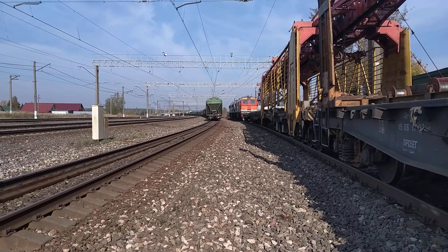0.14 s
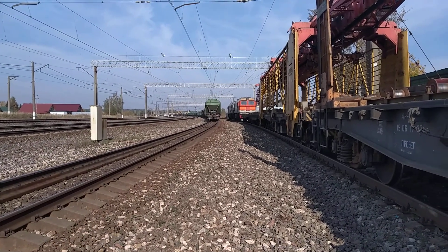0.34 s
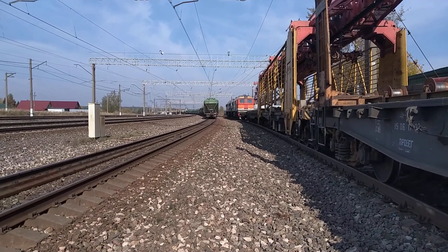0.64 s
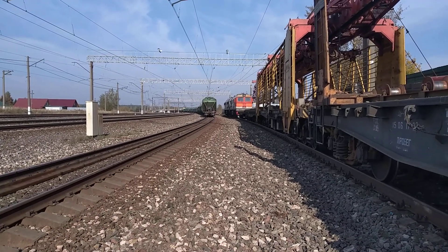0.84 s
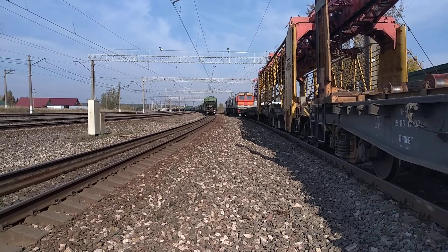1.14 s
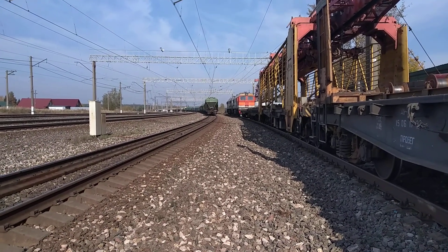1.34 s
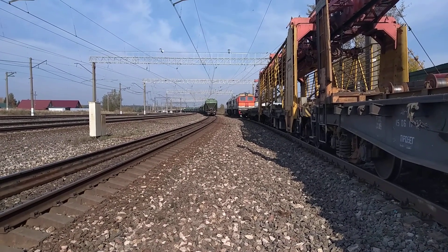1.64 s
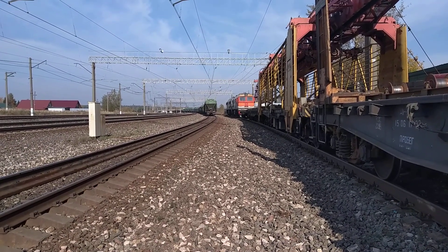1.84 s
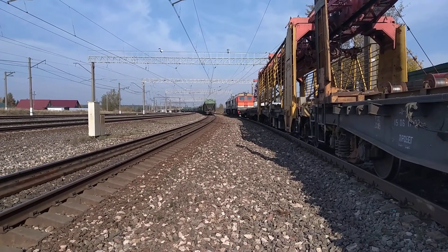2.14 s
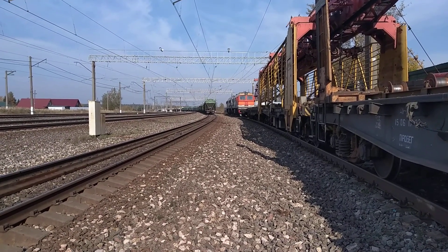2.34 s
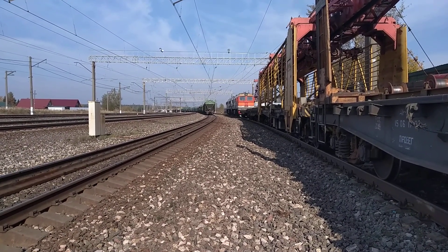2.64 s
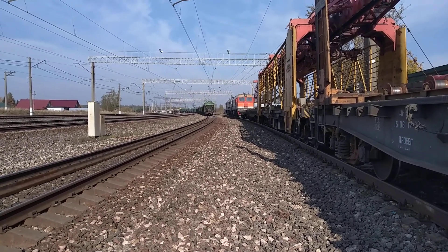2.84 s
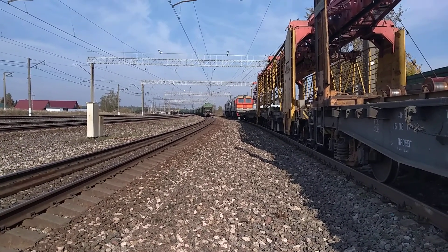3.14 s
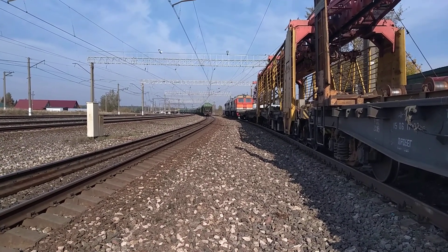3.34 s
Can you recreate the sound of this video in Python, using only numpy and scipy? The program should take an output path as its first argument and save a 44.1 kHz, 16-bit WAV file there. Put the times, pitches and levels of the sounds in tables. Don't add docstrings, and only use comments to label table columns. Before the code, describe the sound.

A freight train's wheels clatter and bang over rail joints as its rumble fades away

```python
import sys
import numpy as np
from scipy import signal
from scipy.fft import rfft, irfft
from scipy.io import wavfile
from scipy.ndimage import uniform_filter1d

SR = 44100
rng = np.random.default_rng(int(sys.argv[2]) if len(sys.argv) > 2 else 0)


def decibels_to_gain(level_db):
    exponent = np.asarray(level_db, float) / 20
    return 10 ** exponent


def dump(signal):
    limited = np.clip(np.atleast_2d(signal).T, -1, 1)
    pcm = np.round(limited * 32767).astype(np.int16)
    wavfile.write(sys.argv[1], SR, pcm)


N = 154350
T = np.arange(N) / SR
HZ = np.arange(N // 2 + 1) * SR / N


def curve(table, hz=HZ):
    table_hz, table_db = np.array(table).T
    return np.interp(np.log(hz + 1), np.log(table_hz), table_db)


def unit(x):
    return x / np.sqrt(np.mean(x ** 2))


def walk(rate_hz):
    hold = int(SR / rate_hz)
    steps = np.repeat(rng.standard_normal(N // hold + 1), hold)
    return unit(uniform_filter1d(uniform_filter1d(steps, hold), hold)[:N])


def band(x, hz, width_hz):
    return signal.lfilter(*signal.iirpeak(hz, hz / width_hz, SR), x)


def swell(start_s, level_db, rise_s, fall_s):
    out = 0
    for s, db, rise in np.broadcast(start_s, level_db, np.abs(rise_s) + 1e-4):
        out = out + decibels_to_gain(db) * np.exp(np.where(T < s, (T - s) / rise, (s - T) / fall_s))
    return out


# pitch_hz, width_hz, boost_db
STEEL_MODES = [(190, 43, 3), (351, 38, 1), (490, 20, 5), (738, 112, 5), (867, 81, 8), (1700, 110, 3),
               (2334, 220, 3), (2933, 64, 10), (3930, 35, 5), (4540, 73, 0), (4300, 59, -12),
               (5334, 130, 6.5)]
# freq_hz, level_db
PORT_SPREAD = [(100, -4.5), (600, -7), (1500, -2), (3000, -2), (8000, -2)]


def steel(colour, grit_db, flicker_db):
    ring_db = sum(max(db, 0) / (1 + (2 * (HZ - hz) / width) ** 2) for hz, width, db in STEEL_MODES)
    contacts = rfft(rng.standard_normal((3, N)) * decibels_to_gain(grit_db * walk(300)))
    shared, separate = contacts[0], contacts[1:]
    rung = (shared + decibels_to_gain(curve(PORT_SPREAD)) * separate) * decibels_to_gain(curve(colour) + ring_db)
    edges_hz = (0, 1200, 3700, SR)
    out = 0
    for lo, hi in zip(edges_hz, edges_hz[1:]):
        out = out + irfft(rung * (HZ >= lo) * (HZ < hi), N) * decibels_to_gain(flicker_db * walk(25.14))
    return unit(out)


# time_s, level_db
ROLL_LEVEL = [(0.0, -35), (0.2, -35), (0.54, -33.5), (0.59, -32.5), (0.65, -30.5), (0.8, -39.5),
              (0.88, -33.5), (1.17, -36), (1.19, -29.5), (1.26, -42.5), (1.32, -30), (1.51, -42.5),
              (1.85, -40.5), (1.89, -48), (1.92, -34.5), (2.31, -46.5), (2.79, -44), (3.5, -49.5)]
# freq_hz, level_db
ROLL_SPECTRUM = [(40, -40), (90, -2), (190, -0.5), (500, -11.5), (1000, -14.5), (3000, -20.5), (8000, -25)]
ROLL_DB = -1.5


def rolling():
    level_db = ROLL_DB + np.interp(T, *np.array(ROLL_LEVEL).T)
    return steel(ROLL_SPECTRUM, 1.2, 1.6) * decibels_to_gain(level_db)


# start_s, level_db, held_s
AIR_PUFFS = [
    (.01, -62, 0.0146),
    (0.094, -50, 0.058),
    (.275, -52, 0.037),
    (.455, -51, 0.057),
    (0.636, -52.5, 0.06),
    (.82, -50.5, 0.071),
    (0.999, -62, 0.13),
]
# freq_hz, level_db
SIZZLE_SPECTRUM = [(7000, -48), (8700, -2.5), (12000, -2), (15500, -6)]
SIZZLE_RISE_S, SIZZLE_FALL_S = 0.016, 0.02


def sizzle():
    gate = 0
    for s, db, held_s in AIR_PUFFS:
        slope = np.minimum((T - s) / SIZZLE_RISE_S, (s + held_s - T) / SIZZLE_FALL_S)
        gate = gate + decibels_to_gain(db) * np.exp(np.minimum(slope, 0))
    hiss = unit(irfft(rfft(rng.standard_normal((2, N))) * decibels_to_gain(curve(SIZZLE_SPECTRUM)), N))
    patchy_db = 1.5 * walk(30)
    port_db = np.array([[8.5], [6.0]])
    return hiss * gate * decibels_to_gain(patchy_db + port_db)


# start_s, level_db
FLAT_BLOWS = [(0.102, -32.5), (0.292, -30.5), (0.482, -34), (0.658, -30.5), (0.859, -30.5), (1.061, -30.5),
              (1.431, -34), (1.62, -36.5), (1.838, -40.5), (2.192, -36), (2.369, -37.5), (2.562, -31.5),
              (2.753, -34), (2.946, -32), (3.133, -34.5), (3.318, -35.5), (3.51, -34.5)]
# freq_hz, level_db
FLAT_SPECTRUM = [(60, -33.5), (190, -3), (800, -7.5), (2000, -9), (5000, -8.5), (9000, -16)]
FLAT_RISE_S, FLAT_FALL_S = 0.019, 0.043


def flat_wheel():
    start_s, level_db = np.array(FLAT_BLOWS).T
    return steel(FLAT_SPECTRUM, 0.74, 1.01) * swell(start_s, level_db, FLAT_RISE_S, FLAT_FALL_S)


# start_s, level_db, pitch_hz, t60_s
BODY_KNOCKS = [(.212, -22, 208, 0.057), (.335, -26.5, 190, 0.1354), (0.485, -20, 229, 0.073),
               (.875, -30.5, 150.6, 0.22), (.938, -22, 250, .2), (.943, -24, 360, .15),
               (1.137, -33, 151.7, 0.12), (1.184, -17.5, 360, 0.073), (1.186, -24, 200, 0.063),
               (1.192, -20.5, 818, 0.073), (1.303, -21, 735.5, 0.11), (1.317, -17.5, 195, 0.13),
               (1.913, -20, 388.4, 0.089), (1.915, -24, 790, 0.064), (2.04, -21.5, 728, 0.093)]
THUD_PUSH_S = 0.0028


def thuds():
    out = 0
    for s, db, hz, t60_s in BODY_KNOCKS:
        t = np.maximum(T - s, 0)
        fade = np.exp(-np.log(1000) * t / t60_s)
        phase = 2 * np.pi * hz * t
        ring = np.sin(phase) + 0.56 * np.sin(1.17 * phase) + 0.35 * fade * np.sin(1.9 * phase)
        push = 1 - np.exp(-t / THUD_PUSH_S)
        out = out + decibels_to_gain(db) * fade * push * ring
    return out


# start_s, thump_db, clatter_db, rise_s
AXLES = [
    (0.227, -52, -34.5, 0.0081),
    (0.353, -36.5, -35, 0.024),
    (1.188, -30, -21, .002),
    (1.317, -34, -25.5, 0.0086),
    (1.915, -28.5, -25.5, .002),
    (2.048, -28.5, -24.5, 0.0038),
]
# freq_hz, level_db
THUMP_SPECTRUM = [(100, -42), (200, -5.5), (400, -8.5), (850, -12), (1100, -28), (2500, -29), (8000, -55)]
# freq_hz, level_db
CLATTER_SPECTRUM = [(100, -16), (300, -2.5), (800, -3), (2000, -5.5), (5000, -7), (8000, -13)]
THUMP_FALL_S, CLATTER_FALL_S, JOINT_BLUR_S = 0.022, 0.065, 0.0058


def joints():
    start_s, thump_db, clatter_db, rise_s = np.array(AXLES).T
    blur = int(JOINT_BLUR_S * SR) + 1
    thump = uniform_filter1d(swell(start_s, thump_db, rise_s, THUMP_FALL_S), blur)
    clatter = uniform_filter1d(swell(start_s, clatter_db, rise_s, CLATTER_FALL_S), blur)
    return steel(THUMP_SPECTRUM, 0.87, 1.1) * thump + steel(CLATTER_SPECTRUM, 1.37, 1.7) * clatter


# start_s, length_s, level_db, pitch_hz
EDDIES = [
    (.385, 0.012, -29, 754),
    (.557, 0.016, -19, 720),
    (0.568, 0.024, -16, 880),
    (0.845, 0.0105, -21, 926),
    (0.86, 0.041, -33.5, 840),
    (1.14, 0.013, -30, 1380),
]


def buffets():
    out, air = 0, rng.standard_normal(N)
    for s, length_s, db, hz in EDDIES:
        gate = np.clip(np.minimum(T - s, s + length_s - T) / 0.0021, 0, 1)
        whistle = unit(band(band(air, hz, 0.6 * hz), hz, 0.6 * hz))
        out = out + decibels_to_gain(db) * gate * whistle
    port_db = np.array([[0.5], [-18]])
    return out * decibels_to_gain(port_db)


ECHO_DB, ECHO_T60_S, SCATTER_HZ = -9, 0.38, 1500


def yard_echo():
    tail = rng.standard_normal((2, N)) * np.exp(-np.log(1000) * T / ECHO_T60_S) * (T > 0.004)
    return decibels_to_gain(ECHO_DB) * rfft(tail) / np.sqrt(np.sum(tail[0] ** 2)) * HZ / (HZ + SCATTER_HZ)


# freq_hz, level_db
LEFT_RESPONSE = [(900, 4.5), (1300, 3), (3000, 1.5), (3750, -10), (4050, 7), (7000, -3.5), (7600, 3.5)]
# freq_hz, level_db
RIGHT_RESPONSE = [(950, 3.5), (1400, 1), (1650, 9), (2900, 0.5), (3600, -8), (4250, 16.5), (5700, 10.5),
                  (6500, 0)]
# freq_hz, lead_rad
LEFT_LEAD = [(0, -0.5), (800, .5), (1800, 6.5), (2400, 7.5), (3200, 2.5), (4150, 8), (4850, 4.5),
             (5600, 0.86)]
SHELF_HZ, SHELF_DB, SHELF_SLOPE_DB_KHZ = 7950, -14, -5.5


def through_ports(train):
    lead_rad = np.interp(HZ, *np.array(LEFT_LEAD).T)
    lead = np.exp(np.array([[0.5j], [-0.5j]]) * lead_rad)
    shelf_db = SHELF_DB / (1 + np.exp(np.clip((SHELF_HZ - HZ) / 110, -50, 50)))
    shelf_db = shelf_db + SHELF_SLOPE_DB_KHZ * np.maximum(HZ - 9500, 0) / 1000
    ports = decibels_to_gain(np.array([curve(LEFT_RESPONSE), curve(RIGHT_RESPONSE)]) + shelf_db)
    return irfft(train * (lead + yard_echo()) * ports, N)


def scene():
    train = rfft(rolling() + flat_wheel() + thuds() + joints())
    return through_ports(train) + sizzle() + buffets()


# freq_hz, share_0_to_1
MUTED_SHARE = [(3000, 0), (3100, .5), (3280, .4), (3450, .06), (6500, .02), (7100, .3), (7700, .05),
               (8300, .75), (9200, .2), (14000, .35), (15500, .6)]
THIN_HZ, THIN_RATIO = 8100, 1.1
MASK_DB, MASK_SHARE = -24, 0.55


def mute_bands(x):
    hz, _, z = signal.stft(x, SR, nperseg=1024)
    luck = rng.random((len(hz) // 4 + 1, z.shape[2] // 4 + 1))
    luck = luck.repeat(4, axis=0).repeat(4, axis=1)[:len(hz), :z.shape[2]]
    share = np.interp(hz[::4], *np.array(MUTED_SHARE).T).repeat(4)[:len(hz), None]
    size = np.abs(z)
    local = uniform_filter1d(size, size=16, axis=1)
    top = (hz > THIN_HZ)[:, None]
    masked = local.mean(0) < decibels_to_gain(MASK_DB) * size[:, 90:140].mean((0, 1))
    lucky = luck > share + MASK_SHARE * masked * top
    strong = (size > THIN_RATIO * local) | ~top
    return signal.istft(z * (lucky & strong), SR, nperseg=1024)[1][:, :N]


def top_cut(x):
    return signal.sosfilt(signal.butter(12, 15810, fs=SR, output="sos"), x)


LOW_CUT_HZ, CEILING = 26, 0.6


def record(dry):
    cut = signal.sosfilt(signal.butter(2, LOW_CUT_HZ, "high", fs=SR, output="sos"), dry)
    limited = CEILING * np.tanh(cut / CEILING)
    return top_cut(mute_bands(limited))


dry = scene()
out = record(dry)
dump(out)
```